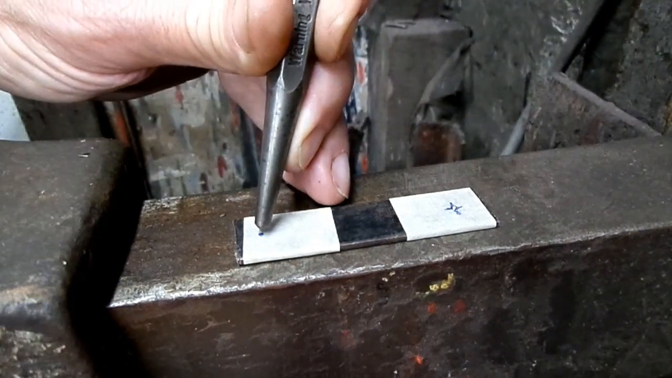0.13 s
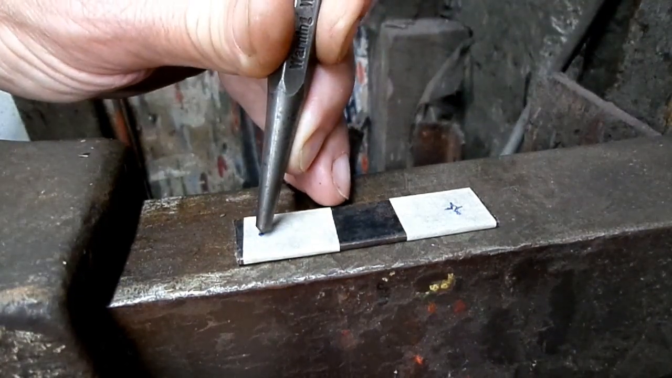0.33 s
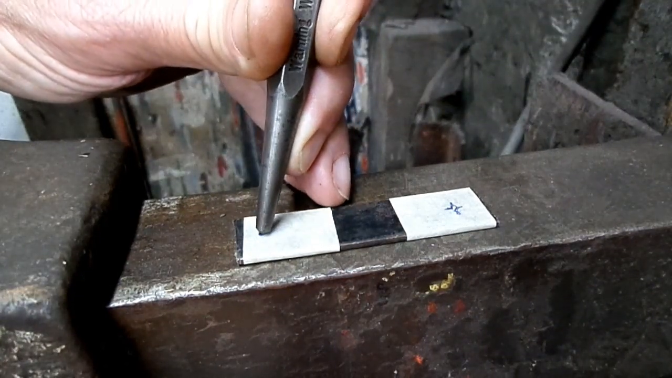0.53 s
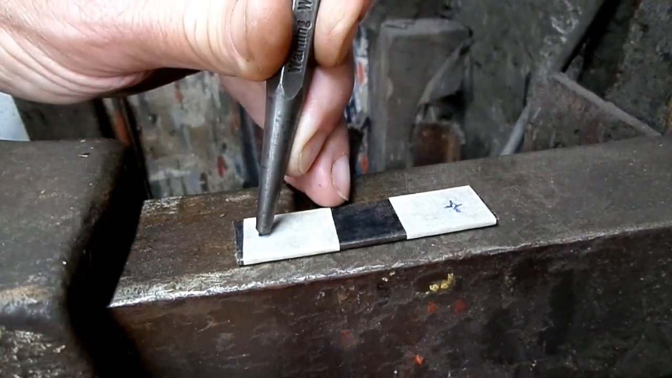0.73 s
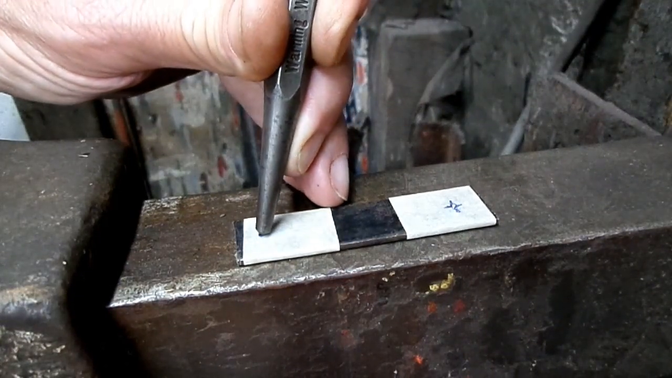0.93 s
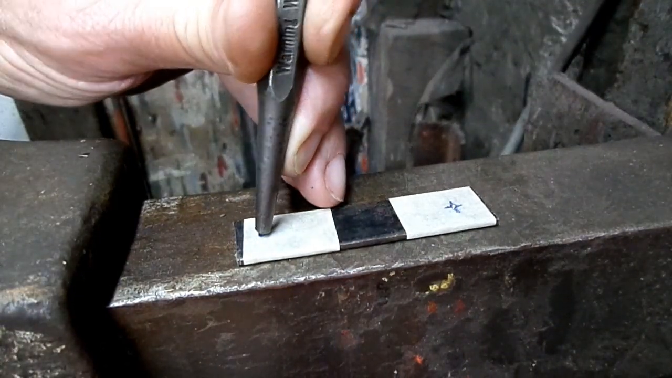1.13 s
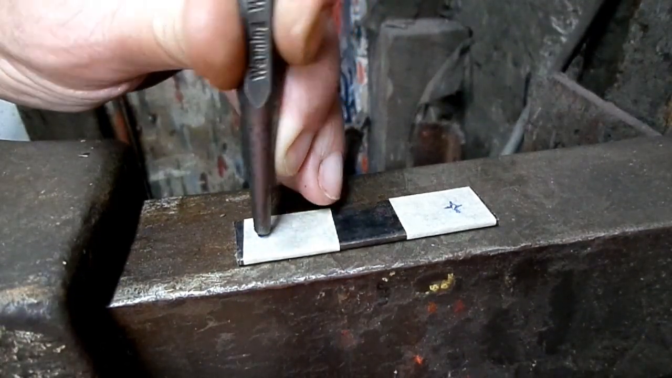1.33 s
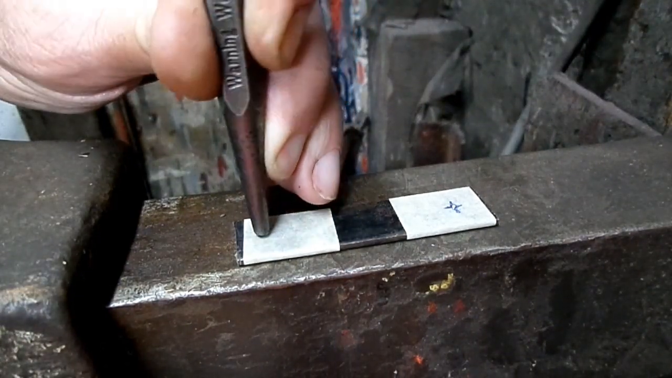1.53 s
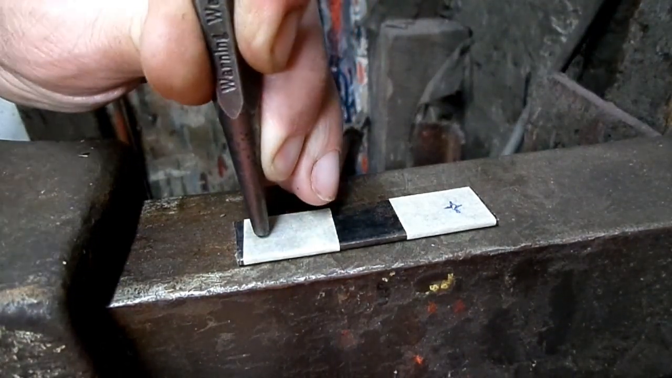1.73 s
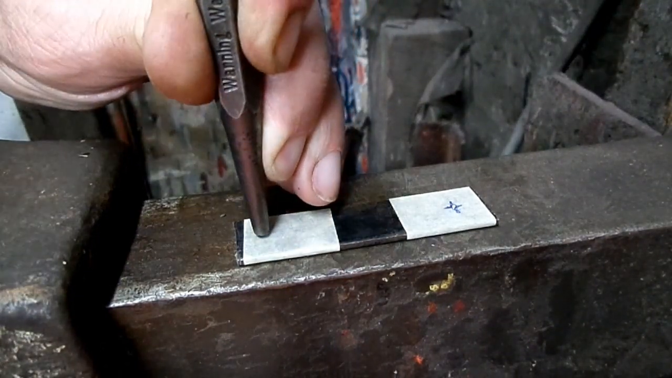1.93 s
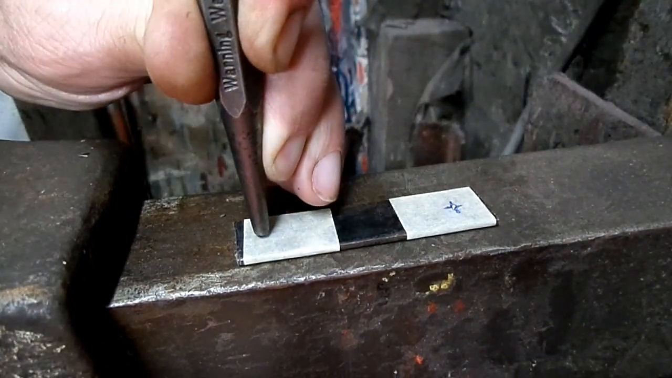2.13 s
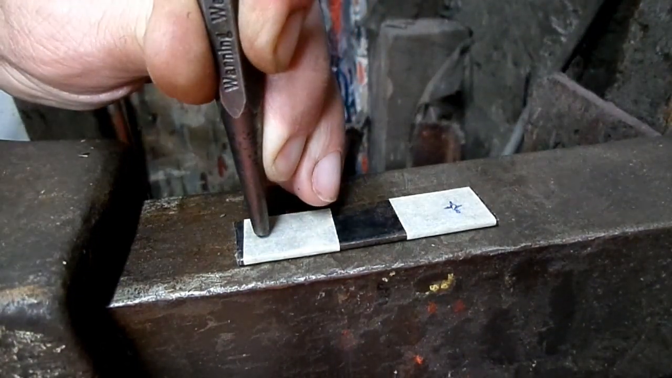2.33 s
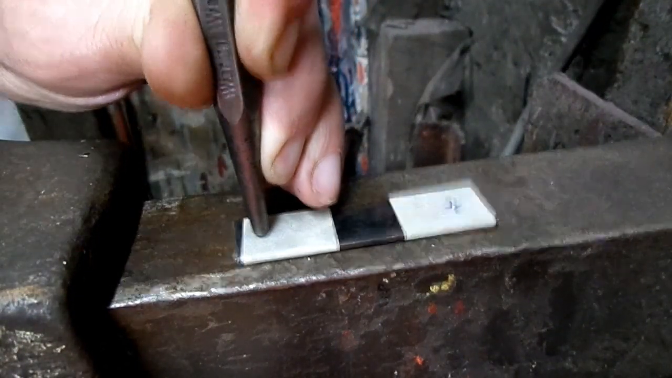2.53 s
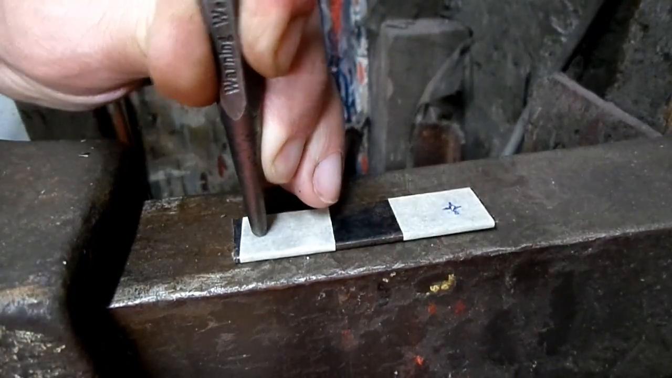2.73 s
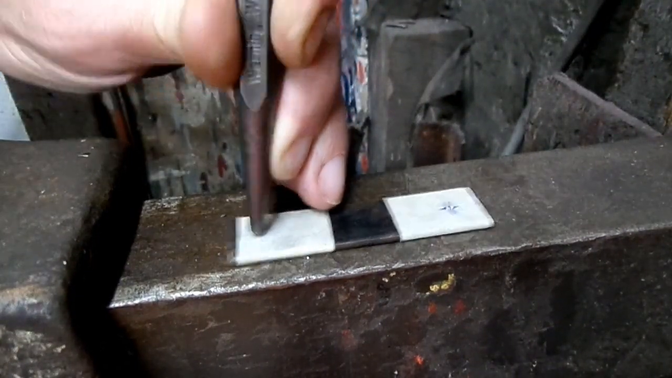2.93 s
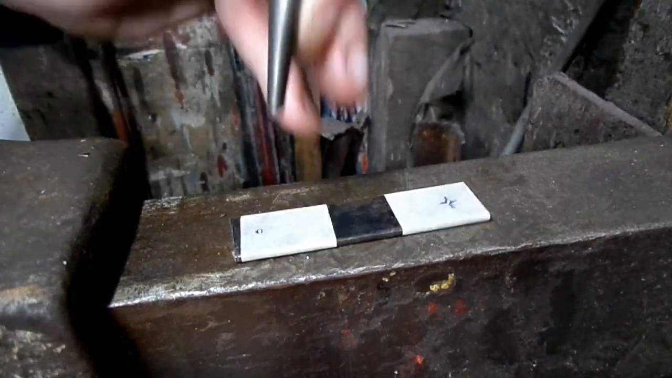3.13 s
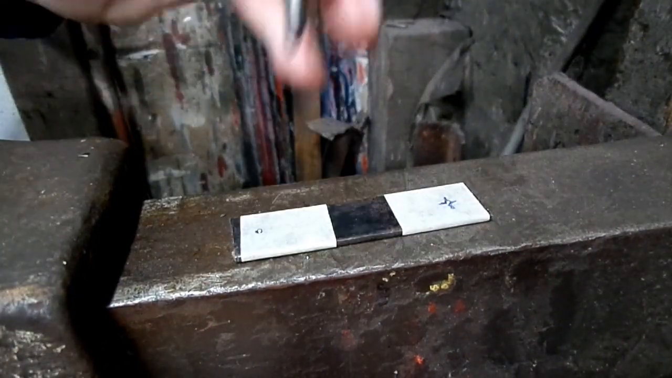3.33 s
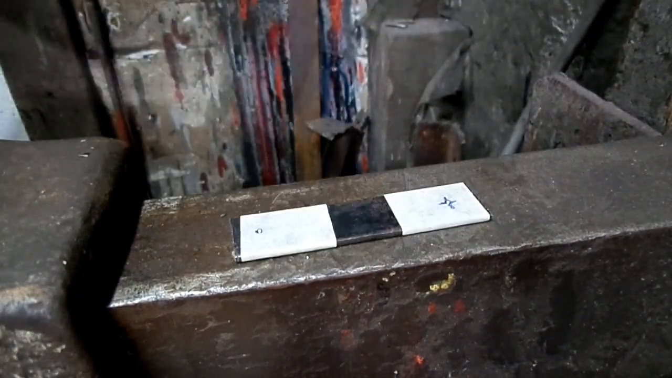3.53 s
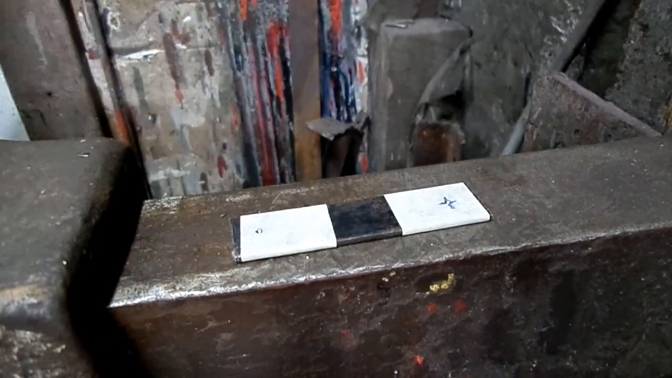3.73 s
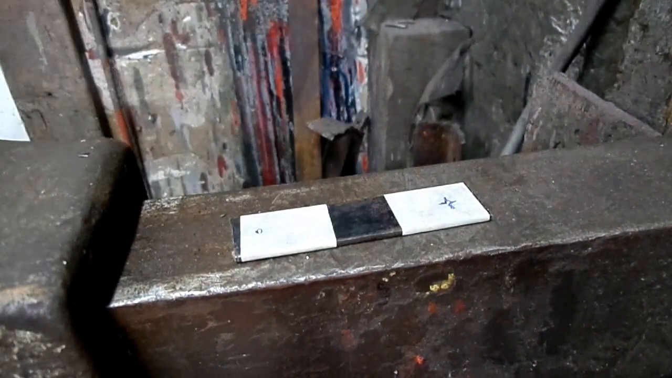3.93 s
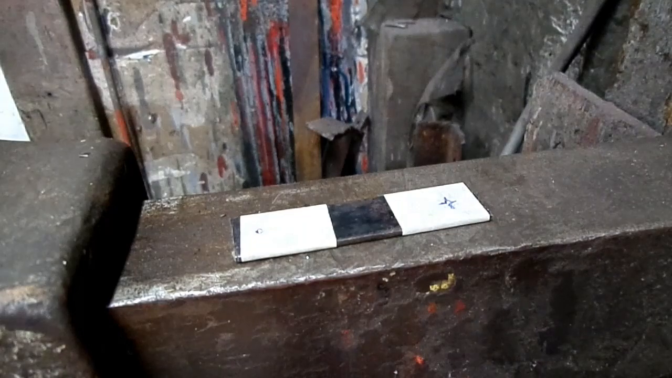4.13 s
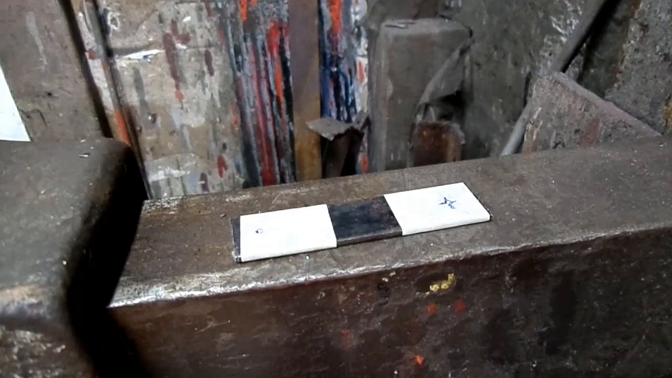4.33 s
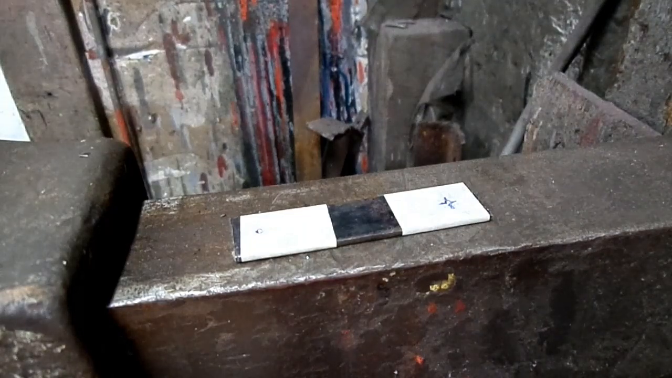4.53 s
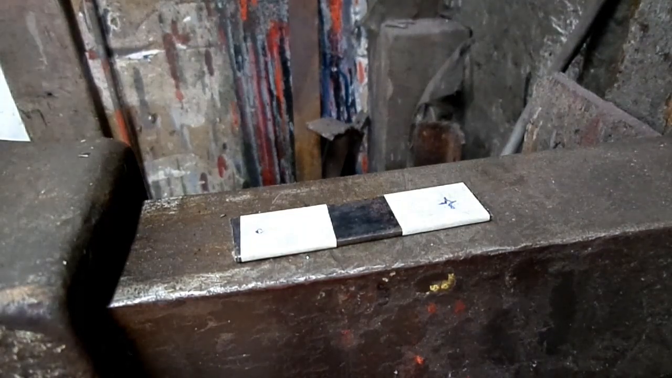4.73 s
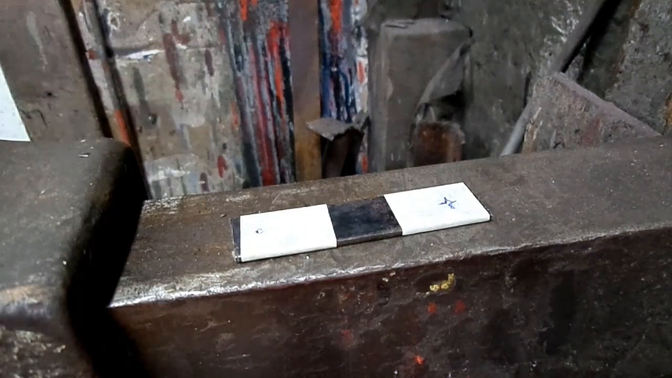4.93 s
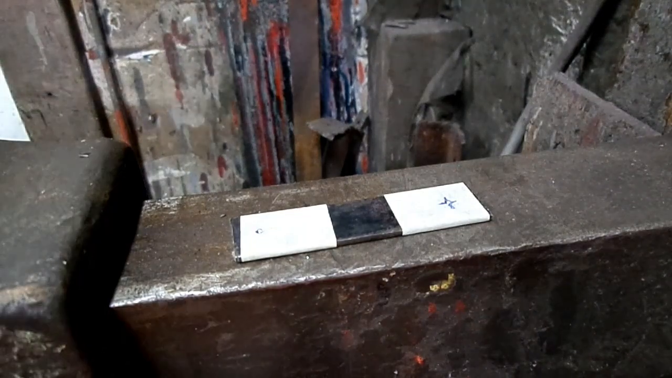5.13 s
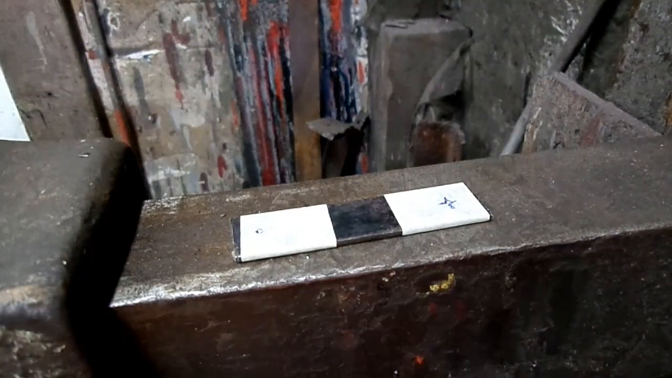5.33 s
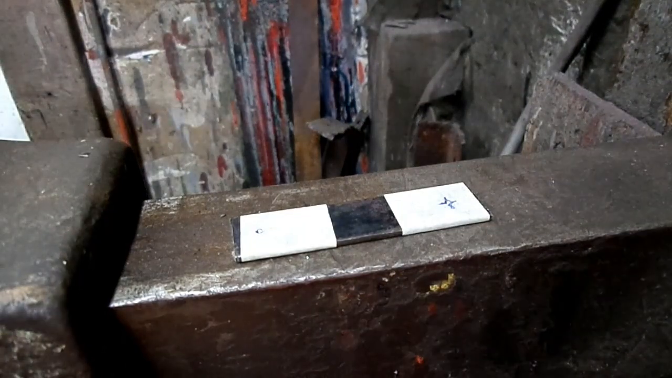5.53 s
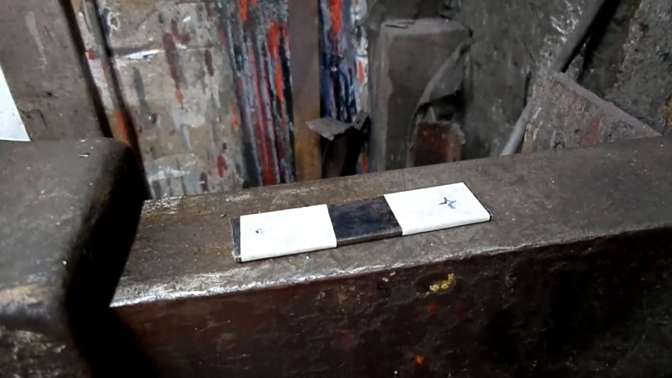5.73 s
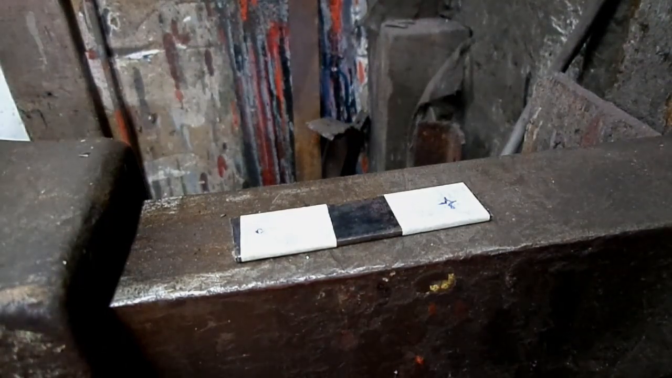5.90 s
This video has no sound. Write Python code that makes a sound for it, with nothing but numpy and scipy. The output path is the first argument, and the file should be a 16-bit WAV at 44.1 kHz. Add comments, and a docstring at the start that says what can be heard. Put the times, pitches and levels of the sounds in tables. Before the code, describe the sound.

Close microphone in a small workshop with low hum and hiss. A punch tip ticks lightly on metal, then a pause. One very loud hammer blow overloads the microphone, bouncing rapidly before it is choked. The background ducks; the thin blank drops back with a bright buzzing clink. Clothing rustles softly with small clicks as the hum and hiss slowly return.

```python
"""In a workshop, a centre punch is set on a metal blank on an anvil and struck once; the hammer bounces.
Dying sines ring the steel, noise bursts make cracks, clicks and the room; shaped noise is air and cloth.
The blow overloads the microphone and its gain control ducks the workshop's hum and hiss.
The blank lifts with the punch, drops back ringing, and clothing rustles as the worker steps away."""
import sys
import numpy as np
from scipy import signal
from scipy.fft import rfft, irfft
from scipy.io import wavfile
from scipy.ndimage import uniform_filter1d

SR = 44100
rng = np.random.default_rng(int(sys.argv[2]) if len(sys.argv) > 2 else 0)


def bounce(signal):
    """Save signal as a 16-bit WAV file at the path given by the first command-line argument."""
    frames = np.transpose(np.atleast_2d(signal))
    limited = np.clip(frames, -1, 1)
    pcm = np.round(limited * 32767).astype(np.int16)
    wavfile.write(sys.argv[1], SR, pcm)


N = 267466
T = np.arange(N) / SR


def amp(db):
    """Decibels to gain."""
    return 10 ** (np.asarray(db) / 20)


def evened(x):
    """Scales to rms 1."""
    return x / np.sqrt(np.mean(x ** 2) + 1e-20)


def read(points, hz):
    """Interpolates a spectrum table on a log-frequency axis."""
    table_hz, value = np.transpose(points)
    return np.interp(np.log(hz + 1), np.log(table_hz), value)


def add(mix, start_s, sound):
    """Mixes a sound in at start_s, cut at the end of the mix."""
    part = mix[round(start_s * SR):][:len(sound)]
    part += sound[:len(part)]


def noise(colour, size=N):
    """Gaussian noise of rms 1; colour gives dB for each frequency."""
    hz = np.fft.rfftfreq(size, 1 / SR)
    spectrum = rfft(rng.standard_normal(size)) * amp(colour(hz))
    return evened(irfft(spectrum, size))


def shaped(points, size=N):
    """Noise of rms 1 with a tabled spectrum."""
    return noise(lambda hz: read(points, hz), size)


def band(centre_hz, octaves, size=N):
    """Noise of rms 1 in one rounded band."""
    def colour(hz):
        offset = np.log2((hz + 1) / centre_hz) / octaves
        return -10 * np.log10(1 + offset ** 4)
    return noise(colour, size)


def fade(t60_s):
    """One second of exponential decay."""
    return amp(-60 * T[:SR] / t60_s)


def choke(start_s, t60_s):
    """Gain over time: full until start_s, then damped."""
    return amp(-60 * np.maximum(T - start_s, 0) / t60_s)


def ring(modes):
    """Modes of a struck body: dying sines started together, alternating in sign."""
    total = np.zeros(SR)
    for k, (hz, db, t60_s) in enumerate(modes):
        sign = (-1) ** k
        total += sign * amp(db) * fade(t60_s) * np.sin(2 * np.pi * hz * T[:SR])
    return total


# Workshop decay. Each row: frequency in Hz, t60 in s.
ROOM_DECAY = [(100, .45), (500, .25), (2000, .28), (4500, 0.33), (8000, .25), (12000, 0.26), (16000, 0.19)]


def reverberation(source, build_up_s=.006):
    """Room response: one second of noise dies away band by band, after a short build-up."""
    hz, t, z = signal.stft(source, SR, nperseg=256)
    decay = amp(-60 * t / read(ROOM_DECAY, hz)[:, None])
    tail = signal.istft(z * decay, SR, nperseg=256)[1][:SR]
    return tail * (1 - np.exp(-T[:SR] / build_up_s))


# Air noise spectrum. Each row: frequency in Hz, relative density in dB per Hz.
AIR_SPECTRUM = [(20, -2.5), (60, -4), (110, -8.5), (170, -11), (250, -11), (600, -15.5), (1200, -18.5),
                (2500, -21.5), (3500, -22), (4400, -25.5), (11000, -27), (15500, -30.5)]
# Hum partials. Each row: frequency in Hz, rms level in dB before the drop.
HUM_PARTIALS = [(59.3, -58), (119, -65), (240, -72)]
HUM_DROP_S, HUM_DROP_DB, HUM_DROP_TAKES_S = 2.9, -5.5, .3  # weaker once the hand has gone


def workshop(air_db=-52.5, hiss_db=-66.5, waver_rad=.6, waver_hz=3):
    """Steady air noise, a narrow hiss, and a hum of sines with slowly drifting phase."""
    hum = np.zeros(N)
    for hz, db in HUM_PARTIALS:
        drift = noise(lambda f: -10 * np.log10(1 + (f / waver_hz) ** 4))
        hum += amp(db) * np.sqrt(2) * np.sin(2 * np.pi * hz * T + waver_rad * drift)
    dropped = np.clip((T - HUM_DROP_S) / HUM_DROP_TAKES_S, 0, 1)
    hum = hum * amp(HUM_DROP_DB * dropped)
    air = amp(air_db) * shaped(AIR_SPECTRUM)
    hiss = amp(hiss_db) * band(centre_hz=3470, octaves=0.11)
    return air + hiss + hum


# Tools and hands. Each row: start in s, level in dB, centre in Hz, width in octaves, t60 in s.
HANDLING_CLICKS = [(.170, -47, 4470, 0.48, .02), (.585, -46.5, 3760, 0.3, .025),
                   (2.607, -42.5, 2170, 0.7, 0.033), (2.833, -28.5, 500, 1.4, .012),
                   (3.056, -32.5, 10000, 1.8, .017), (3.0983, -38, 4200, 1.1, 0.029),
                   (3.616, -45, 3000, 0.6, .04), (3.640, -42.5, 4500, .9, .02),
                   (3.905, -47, 249, 0.65, 0.16), (4.135, -53, 1700, .4, 0.16),
                   (4.635, -36, 3800, 0.21, .016), (4.755, -41, 1610, 0.36, 0.031),
                   (5.153, -41.5, 500, 0.7, .11), (5.403, -37.5, 3700, 0.25, 0.015),
                   (5.918, -44, 4300, 0.24, .02), (5.970, -43, 300, 0.88, 0.026)]


def handling():
    """Short clicks and knocks of tools and hands: decaying bands of noise."""
    out = np.zeros(N)
    for start_s, db, hz, octaves, t60_s in HANDLING_CLICKS:
        add(out, start_s, amp(db) * band(hz, octaves, SR) * fade(t60_s))
    return out


STROKE_FALL_RATIO = 1.45  # fall time over rise time


def swell(peak_s, db, rise_s):
    """Gain over time of one rubbing stroke: exponential rise to the peak, slower exponential fall."""
    distance_s = np.maximum(peak_s - T, (T - peak_s) / STROKE_FALL_RATIO)
    return amp(db) * np.exp(-distance_s / rise_s)


# Cloth spectrum. Each row: frequency in Hz, relative density in dB per Hz.
CLOTH_SPECTRUM = [(60, -10), (200, 3), (400, 9), (900, 5), (1300, 5), (1900, 5.5), (2600, 2), (5000, 0.5),
                  (7000, -2), (16000, -3)]
# Strokes of cloth as the worker moves. Each row: peak in s, level in dB, rise in s.
CLOTH_STROKES = [(3.66, -58, .15), (3.92, -50.5, .02), (4.045, -50.5, 0.023), (4.135, -49.5, .04),
                 (4.27, -53.5, 0.053), (4.605, -47, .018), (4.73, -45, 0.064), (4.88, -42.5, .026),
                 (5.195, -50, 0.051)]
# Resonances of the hollow scrape. Each row: centre in Hz, width in octaves, relative level in dB.
SCRAPE_BANDS = [(480, .4, 0.5), (1890, 0.077, 0)]
SCRAPE_S, SCRAPE_DB, SCRAPE_RISE_S = 4.88, -55.5, .1


def clothing(grain_db=1.6, fold_db=1.04):
    """Cloth rubs in fine grains and slower folds, with a faint hollow scrape under the strongest stroke."""
    grain = evened(uniform_filter1d(rng.standard_normal(N), size=200))
    fold = evened(uniform_filter1d(rng.standard_normal(N), size=1500))
    friction = evened(amp(grain_db * grain + fold_db * fold))
    stroke_power = sum(swell(*row) ** 2 for row in CLOTH_STROKES)
    cloth = shaped(CLOTH_SPECTRUM) * np.sqrt(stroke_power)
    hollow = sum(amp(db) * band(hz, octaves) for hz, octaves, db in SCRAPE_BANDS)
    scrape = hollow * swell(SCRAPE_S, SCRAPE_DB, SCRAPE_RISE_S)
    return friction * (cloth + scrape)


# Steel on steel, for ticks, clicks and cracks. Each row: frequency in Hz, relative density in dB per Hz.
CRACK_SPECTRUM = [(100, -0.5), (700, 0), (1500, -6.5), (2400, -3), (4500, -4.5), (5500, -6.5), (7000, 1),
                  (9000, -1), (12000, 3), (14000, -2.5), (16000, -1)]


def crack(t60_s):
    """Impact of steel on steel: a decaying burst of shaped noise."""
    return shaped(CRACK_SPECTRUM, SR) * fade(t60_s)


# Punch tip touching the blank. Each row: start in s, level in dB.
TIP_TOUCHES = [(.9882, -28.5), (1.029, -27), (1.098, -49), (1.1275, -45.5), (1.1535, -48), (1.181, -31),
               (1.1833, -31.5), (5.918, -43.5)]
# Tip modes. Each row: frequency in Hz, relative level in dB, t60 in s.
TIP_MODES = [(4470, -19, 0.0096), (5070, -29, 0.0082), (7440, -26, 0.014), (8470, -11, .016),
             (11090, -18, 0.064), (12340, 1.5, 0.015), (12750, -15, .018), (15000, -22, 0.023)]


def placing(tick_db=-3, tick_t60_s=0.0082):
    """The punch tip ticks on the metal, its ring damped by the fingers."""
    out = np.zeros(N)
    for start_s, db in TIP_TOUCHES:
        tick = amp(tick_db) * crack(tick_t60_s)
        add(out, start_s, amp(db) * (ring(TIP_MODES) + tick))
    return out


# Blank landing on the anvil. Each row: start in s, ring level in dB, click level in dB.
BLANK_LANDINGS = [(3.1953, -44, -24), (3.199, -18.5, -18), (3.2183, -25, -21)]
# Blank modes. Each row: frequency in Hz, relative level in dB, t60 in s.
BLANK_MODES = [(168, -21.5, .08), (427, -22, 0.14), (679, -25, 0.16), (1427, -21.5, 0.22),
               (2139, -16, 0.15), (3230, -17.5, 0.15), (5325, -9, 0.23), (6020, 1, 0.11), (7130, -17, .13),
               (7870, -5, 0.027), (9916, -12, .09), (10990, 0.5, .1), (11690, 6, 0.035), (11810, 4, .035),
               (14932, -7, .11), (15650, -9, .09)]
# Buzz spectrum. Each row: frequency in Hz, relative density in dB per Hz.
BUZZ_SPECTRUM = [(100, -13), (500, 0), (1500, -4), (2100, 2), (3000, -6), (6000, -1), (10000, 2),
                 (12500, -4), (15500, 1.5)]
BUZZ_RE_CLICK_DB, BUZZ_T60_S = -12, 0.19
FLAT_S, FLAT_T60_S = 3.239, .08  # the blank comes to lie flat and its buzz is damped


def blank(click_t60_s=0.015, contacts_per_s=900, contact_t60_s=.008):
    """The blank lands on one end, then the other, and buzzes in random contacts until it lies flat."""
    out, buzz_gain = np.zeros(N), np.zeros(N)
    for start_s, ring_db, click_db in BLANK_LANDINGS:
        click = amp(click_db) * crack(click_t60_s)
        add(out, start_s, amp(ring_db) * ring(BLANK_MODES) + click)
        add(buzz_gain, start_s, amp(click_db + BUZZ_RE_CLICK_DB) * fade(BUZZ_T60_S))
    hits = 1. * (rng.random(N) < contacts_per_s / SR)
    contacts = signal.oaconvolve(hits, fade(contact_t60_s))[:N]
    buzz = evened(contacts * shaped(BUZZ_SPECTRUM))
    return out + buzz_gain * choke(FLAT_S, FLAT_T60_S) * buzz


# Hammer on punch. Each row: start in s, ring, crack and thump levels in dB. Row 1 is the main blow.
HAMMER_BLOWS = [(2.6466, -34, -24, -45), (2.648, 17, 14.5, -4.5), (2.6563, 2, 13, -11),
                (2.6681, 13.5, 13, -5)]
# Punch held in the fingers. Each row: frequency in Hz, relative level in dB, t60 in s.
PUNCH_MODES = [(4480, -22, 0.12), (6200, -19.5, .1), (7450, -20.5, .09), (8540, -12.5, 0.07),
               (10410, -13, .047), (11350, -13.5, 0.065), (11675, -11, 0.045), (11870, -9, .056),
               (12435, 0, .07), (12590, -11, .06), (14240, -21.5, .07), (15460, -15, 0.088)]
# Anvil stand. Each row: frequency in Hz, relative level in dB, t60 in s.
STAND_MODES = [(151, -15.5, .22), (255.1, -9, .12), (339, -8, 0.16), (382, -3.5, 0.13), (417.3, -5.5, 0.11),
               (547, -0.5, 0.13), (595.3, 0, .08), (725.4, -3, .09), (870, -2, .07), (1027, -3, 0.06)]
# Workshop's answer to the blow. Each row: frequency in Hz, relative density in dB per Hz.
ECHO_SPECTRUM = [(60, 4), (130, 2), (350, 8.5), (900, 6), (1500, -3.5), (3600, -4.5), (4500, -2),
                 (5400, -6), (6700, -1.5), (8800, -1.5), (11000, 2), (12500, 2.5), (14000, -1), (16000, -1)]
# Steel around the anvil singing on. Each row: centre in Hz, width in octaves, level in dB, t60 in s.
AFTERRING_BANDS = [(4480, .05, -22, .35), (6700, 0.08, -14.5, 0.29), (12440, .012, -13, 0.25)]
SETTLE_S = 2.672  # the hammer comes to rest on the punch


def hammer(crack_t60_s=.035, echo_db=0, push_db=25, push_s=.0011, settle_t60_s=0.015):
    """Each blow cracks, rings the punch and thumps the stand; the main one pushes air and fills the room."""
    steel, thud = np.zeros(N), np.zeros(N)
    for start_s, ring_db, crack_db, thump_db in HAMMER_BLOWS:
        struck = amp(ring_db) * ring(PUNCH_MODES) + amp(crack_db) * crack(crack_t60_s)
        add(steel, start_s, struck)
        add(thud, start_s, amp(thump_db) * ring(STAND_MODES))
    # the weight of the resting hammer chokes the punch
    steel = steel * choke(SETTLE_S, settle_t60_s)
    push = amp(push_db) * np.sin(np.pi * np.minimum(T[:SR] / push_s, 1)) ** 2
    tail = amp(echo_db) * reverberation(shaped(ECHO_SPECTRUM, SR))
    for hz, octaves, db, t60_s in AFTERRING_BANDS:
        tail = tail + amp(db) * band(hz, octaves, SR) * fade(t60_s)
    add(steel, HAMMER_BLOWS[1][0], push + tail)
    return steel + thud


def scene(wet_db=-20):
    """The blow and the close sounds, the latter with a little room, over the workshop's background."""
    near = placing() + blank() + handling() + clothing()
    room = reverberation(rng.standard_normal(SR))
    wet = signal.oaconvolve(near, room / np.linalg.norm(room))[:N]
    return (hammer() + near + amp(wet_db) * wet + workshop())[None]


def record(dry, threshold_db=-8, cut_db_per_db=2, deepest_db=20, recovery_db_per_s=11, attack_s=.015,
           ceiling=.85, edge_hz=15900):
    """Gain control reacts too late for the blow, which clips softly, then recovers slowly; low-pass."""
    power = signal.lfilter(np.ones(64) / 64, 1, dry[0] ** 2)
    power_db = 10 * np.log10(power + 1e-12)
    wanted_cut_db = np.clip(power_db - threshold_db, 0, None) * cut_db_per_db
    # a running maximum on a rising ramp lets the cut fall at a constant rate
    ramp_db = recovery_db_per_s * T
    held_cut_db = np.maximum.accumulate(np.minimum(wanted_cut_db, deepest_db) + ramp_db) - ramp_db
    lag = np.exp(-1 / (attack_s * SR))
    cut_db = signal.lfilter([1 - lag], [1, -lag], held_cut_db)
    ducked = dry / amp(cut_db)
    clipped = ceiling * np.tanh(ducked / ceiling)
    low_pass = signal.firwin(511, edge_hz, window=("kaiser", 9), fs=SR)
    return signal.oaconvolve(clipped, low_pass[None], "same")


dry = scene()
out = record(dry)
bounce(out)
```